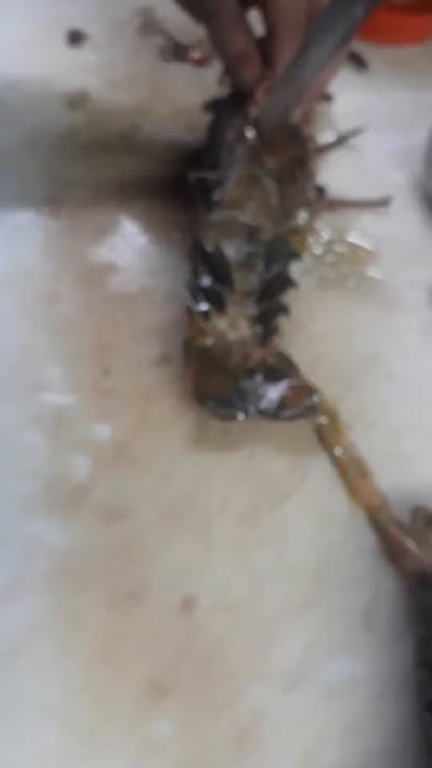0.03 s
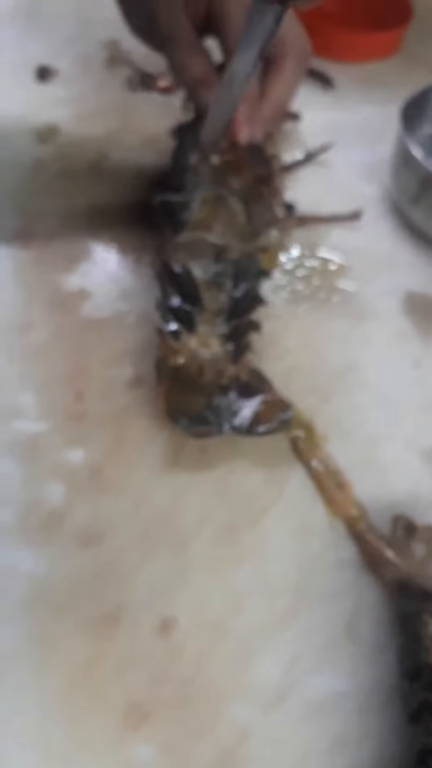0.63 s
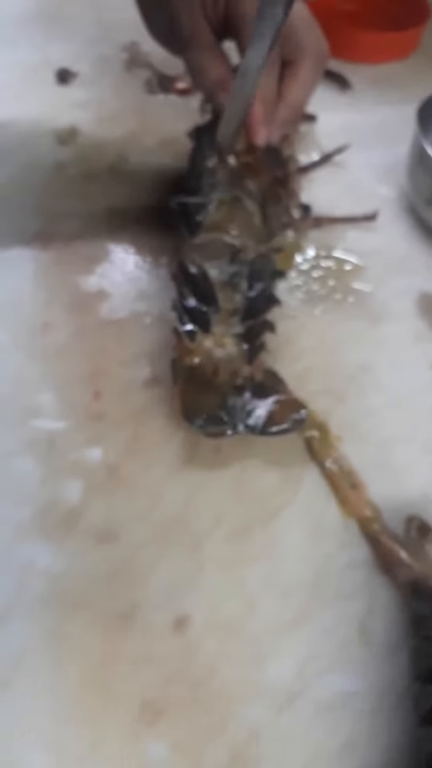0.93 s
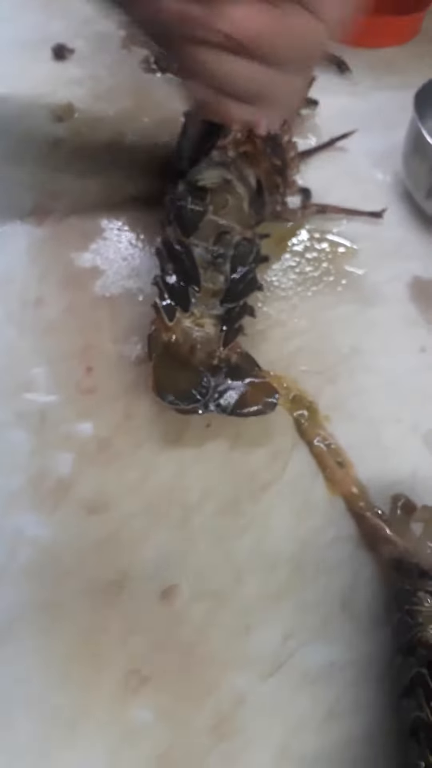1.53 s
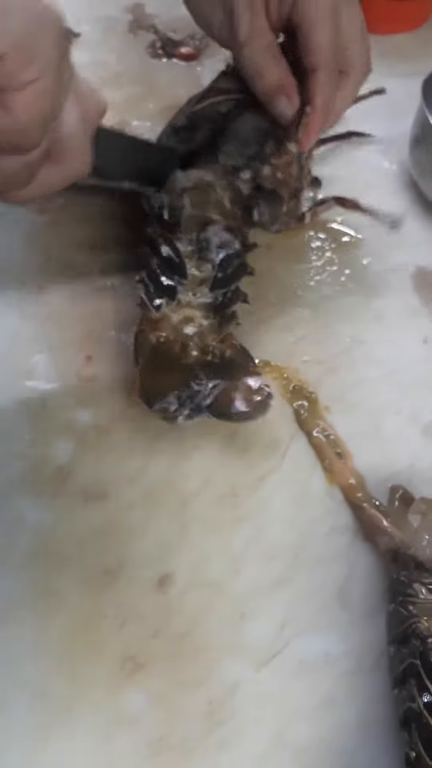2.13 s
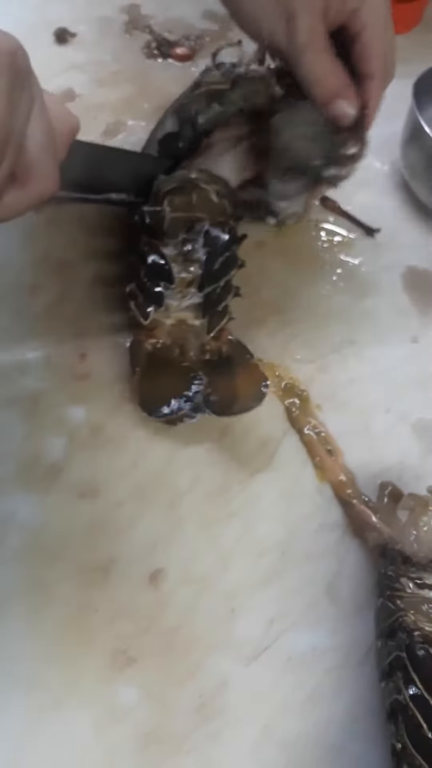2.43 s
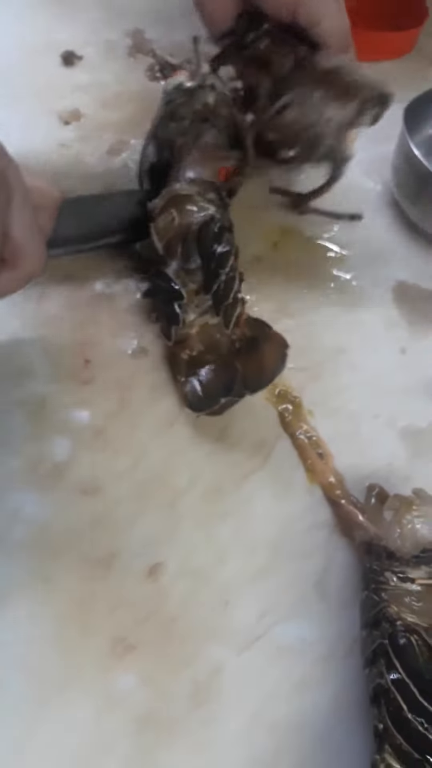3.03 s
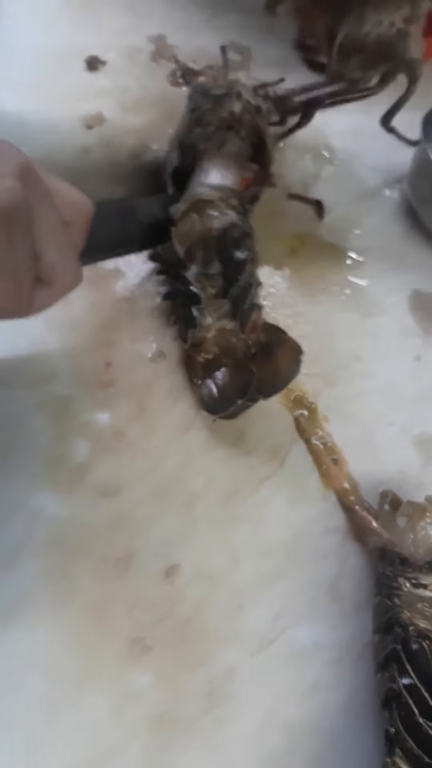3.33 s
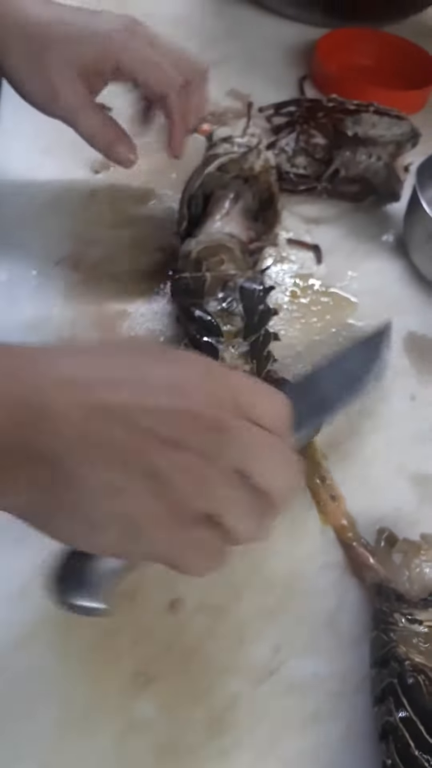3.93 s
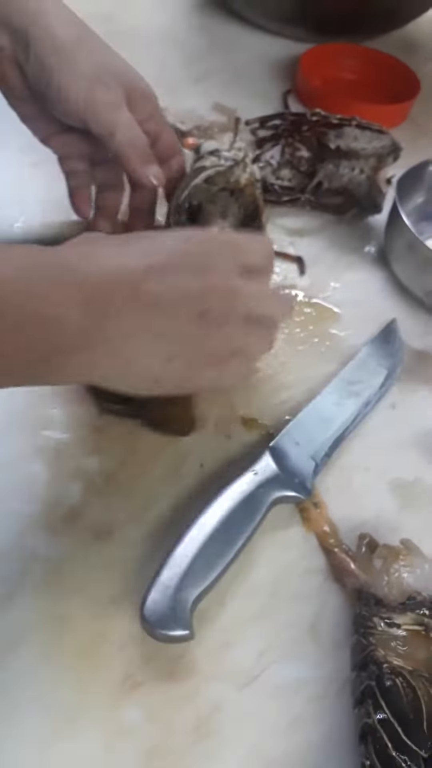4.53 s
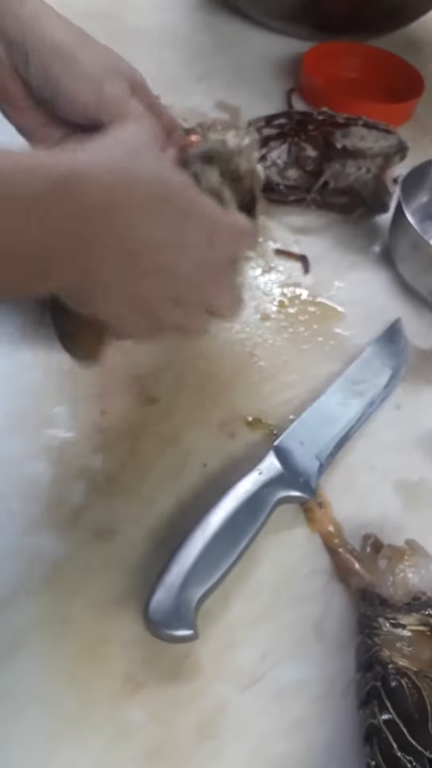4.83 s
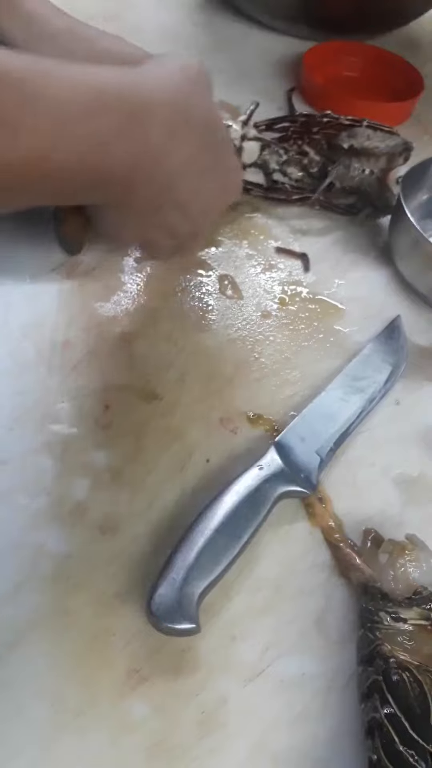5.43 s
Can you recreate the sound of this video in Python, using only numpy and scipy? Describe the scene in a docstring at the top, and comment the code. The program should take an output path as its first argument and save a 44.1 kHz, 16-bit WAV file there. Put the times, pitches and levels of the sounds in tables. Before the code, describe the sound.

A kitchen fan roars throughout, gently swelling and sinking. Close to the microphone, a knife cuts into a lobster, and the shell snaps in an irregular run of short, dry cracks with faint squeaky scrapes. After a pause and one more small scrape, the steel knife is put down on a plastic board, knocking and clinking brightly as it rocks to rest. The room adds a short tail.

```python
"""A lobster is cut open on a plastic board: the shell snaps in short, dry cracks and the blade scrapes.
The all-steel knife is then put down, knocks on the board and clinks as it rocks to rest.
Behind it a kitchen roar of moving air, probably an extractor fan, swells and sinks.
One close microphone hears it all, with a short room tail on the shell and the knife."""
import sys
import numpy as np
from scipy import signal
from scipy.fft import rfft, irfft, next_fast_len
from scipy.io import wavfile
from scipy.ndimage import uniform_filter1d, minimum_filter1d, map_coordinates

SR = 44100
rng = np.random.default_rng(int(sys.argv[2]) if len(sys.argv) > 2 else 0)


def file_out(sig):
    """Save sig as 16-bit WAV at sys.argv[1]."""
    # one column per channel
    cols = np.atleast_2d(sig).T
    # limit, then scale
    lim = np.clip(cols, -1, 1)
    pcm = np.round(lim * 32767).astype(np.int16)
    wavfile.write(sys.argv[1], SR, pcm)


N = 245637

# The swell of the fan's roar. Each row: time in seconds, strength in dB.
ROAR_SWELL = [(0.1, -27.5), (0.6, -25.5), (1.0, -25), (1.4, -28), (1.75, -29.0), (2.1, -32), (2.7, -34.5),
              (3.2, -32.9), (3.6, -25.5), (4.1, -24.5), (4.55, -28.5), (5.25, -29.5), (5.57, -26)]
# The roar's low, middle and top layers. Each row: frequency in Hz, relative level in dB.
RUMBLE_SPECTRUM = [(25, -33), (45, -39), (65, -17), (88, -2), (112, -3), (140, 2), (195, 0.5), (225, 2),
                   (255, -2.5), (305, 2.5), (350, -6.5), (450, -13.5), (700, -37)]
AIR_SPECTRUM = [(200, -15.5), (350, -6.5), (450, -4.5), (600, -2.5), (800, -2), (1250, 0), (1700, -2),
                (2200, -3.5), (3000, -6), (4500, -6), (7000, -14.5), (9100, -23.5), (15000, -78)]
HISS_SPECTRUM = [(3500, -13), (5500, -6), (6500, -5), (8000, 0.5), (9500, 0.5), (11500, 2.5), (13500, -1.5),
                 (15800, -4)]
# A faint drone, perhaps of the fan housing. Each row: centre in Hz, width in Hz, relative level in dB.
DRONE_PEAKS = [(95, 2.9, -8.5), (194.7, 11.5, -0.5), (301.4, 4.4, -1.5)]
# The shell breaks. Each row: start in seconds, level in dB, fragment pitch in Hz,
# splinter trim in dB, hollow ring trim in dB.
SHELL_CRACKS = [(1.0287, -4, 5200, 1, 2), (1.0338, -2, 3900, -7.5, -8), (1.149, -14.5, 3500, -7, 2),
                (1.3715, -5, 4740, -8.5, -11), (1.6585, -5, 5740, -11, -12), (1.7980, -10.5, 3180, -4, -15),
                (1.875, -13.5, 2900, -8, -10), (1.8990, -8, 4600, -12, -2), (1.9214, -14, 3600, -19, -18),
                (1.9400, -11.5, 5170, -0.5, -17), (2.0339, -8, 4600, -9.5, -2),
                (2.0989, -8.5, 2970, -6, -4), (2.1016, -4.5, 4600, -8, -2.5), (2.2669, -9, 4300, -26, -17),
                (2.302, -15, 4200, -15, -12)]
# The colour of a 4 kHz fragment and of splinters. Each row: frequency in Hz, relative level in dB.
FRAGMENT_SPECTRUM = [(300, -47), (1000, -4.5), (2500, -2), (4000, 7), (5000, -1), (6500, -8.5),
                     (16000, -25)]
SPLINTER_SPECTRUM = [(2000, -13), (5000, -0.5), (9000, -9.5), (13000, -1.5), (16000, -5.5)]
# The hollow carapace. Each row: frequency in Hz, t60 in seconds, relative level in dB.
CARAPACE_MODES = [(1065, 0.014, -6), (1830, .03, -13), (2300, 0.018, -15), (2790, 0.018, -7.5)]
# The blade drags on the shell. Each row: start in seconds, length in seconds, squeak level in dB,
# squeak pitch in Hz, rasp level in dB.
BLADE_STROKES = [(1.033, 0.066, -36, 3430, -35), (1.576, 0.064, -29, 3450, -34),
                 (2.112, 0.17, -40, 4500, -44), (3.595, 0.071, -36, 4550, -30.5)]
# The colour of the rasp. Each row: frequency in Hz, relative level in dB.
RASP_SPECTRUM = [(2000, -8), (4000, -3), (6000, 3), (8500, -1.5), (10000, -8), (13000, -12), (16000, -23)]
# The knife touches down. Each row: start in seconds, ring level in dB, damping factor, tick level in dB.
KNIFE_CLINKS = [(4.0322, 0.5, 2.2, -15), (4.089, -4, 4, -18), (4.1951, 1, 0.99, -13),
                (4.2598, -3, 3.4, -16), (4.295, 1, 1.1, -11.5)]
# The part of the knife that lands, one for each clink.
CLINK_CONTACTS = ["edge", "heel", "handle", "heel", "tip"]
# The knife's ring. Each row: frequency in Hz, t60 in seconds before damping, then relative levels in dB
# for a landing on the edge, handle, heel and tip.
STEEL_MODES = [(3445, .36, -15.5, -18, -42, -25), (4086, .35, -32, -39, -45, -39),
               (4517, .38, -30, -28, -15, -24), (4673, .31, -23, -9, -32, -11.5),
               (5128, .5, -22, -16.5, -22, -39), (5895, .35, -29, -25, -45, -44),
               (6445, .14, -42, -15.5, -29, -23), (6820, .22, -40, -32, -36, -38),
               (7219, .29, -43, -21, -38, -20), (7830, .22, -42, -38, -54, -33),
               (9711, .27, -44, -21, -42, -34), (10650, .13, -48, -19, -38, -15),
               (11005, .14, -40, -21, -44, -18), (11120, .16, -43, -27, -47, -20),
               (11790, .2, -50, -36, -52, -25), (12335, .14, -50, -23, -43, -24),
               (13290, .26, -58, -29, -44, -42), (13825, .12, -60, -44, -46, -26),
               (15180, .15, -57, -34, -52, -54)]
# The handle thumps the board. Each row: start in seconds, level in dB, low-pass cutoff in Hz.
HANDLE_KNOCKS = [(4.1762, 4, 5000), (4.2542, -1.5, 1490)]
# The plastic board. Each row: frequency in Hz, t60 in seconds, relative level in dB.
BOARD_MODES = [(197, 0.059, -24.5), (430, 0.022, -13.5), (765, 0.025, -17), (1170, 0.0087, -11),
               (2000, 0.0088, -1), (2300, 0.0097, -6), (2910, 0.022, -11), (4520, 0.042, -14)]
# The kitchen's tail. Each row: frequency in Hz, t60 in seconds.
ROOM_DECAY = [(200, 0.93), (2000, 0.37), (14000, 0.38)]


def amp(db):
    """Decibels to gain."""
    return 10 ** (np.asarray(db) / 20)


def unit(x):
    """Scale to rms 1."""
    return x / np.sqrt(np.mean(x ** 2) + 1e-20)


def along(points, hz):
    """Read (Hz, value) points on a log frequency axis."""
    freqs, values = np.transpose(points)
    return np.interp(np.log(hz + 1), np.log(freqs + 1), values)


def clock(size):
    """Sample times in seconds."""
    return np.arange(size) / SR


def filtered(x, response):
    """Filter x by a gain given as a function of Hz."""
    size = x.shape[-1]
    padded = next_fast_len(size + 4096)
    return irfft(rfft(x, padded) * response(np.fft.rfftfreq(padded, 1 / SR)), padded)[..., :size]


def coloured(x, spectrum, stretch=1):
    """EQ x with a spectrum, stretched in frequency, and scale to rms 1."""
    return unit(filtered(x, lambda hz: amp(along(spectrum, hz / stretch))))


def fade(t, t60):
    """Exponential decay, 60 dB down after t60 seconds."""
    return np.exp(-np.log(1000) * t / max(t60, 1e-4))


def ring(t, modes):
    """Struck modes, each (Hz, t60 s, dB), dying away from random phases."""
    return sum(amp(db) * fade(t, t60) * np.sin(2 * np.pi * (hz * t + rng.random()))
               for hz, t60, db in modes)


def add(track, start_s, sound):
    """Mix a sound into the track."""
    part = track[round(start_s * SR):][:len(sound)]
    part += sound[:len(part)]


def wobble(knots_per_s):
    """A smooth random curve."""
    return map_coordinates(rng.standard_normal(256), [clock(N) * knots_per_s])


def rush(spectrum, patchy_db):
    """Turbulent air: noise whose level varies in random patches of time and frequency."""
    bands = signal.stft(rng.standard_normal(N), nperseg=512)[2]
    patches = uniform_filter1d(rng.standard_normal(bands.shape), size=6, axis=0)
    patches = uniform_filter1d(patches, size=12, axis=1)
    turbulence = signal.istft(bands * amp(patchy_db * unit(patches)), nperseg=512)[1][:N]
    return coloured(turbulence, spectrum)


def fan():
    """One swell rides rumble, rushing air and hiss together; a faint drone follows the rumble."""
    def housing(hz):
        return sum(amp(db) / (1 + ((hz - centre) / (width / 2)) ** 2)
                   for centre, width, db in DRONE_PEAKS)

    t = clock(N)
    swell_db = np.interp(t, *np.transpose(ROAR_SWELL)) + 28.5  # unity gain at a strength of -28.5 dB
    past_middle_s = t - t.mean()  # rumble and hiss sink slowly against the air
    drone = unit(filtered(rng.standard_normal(N), housing))
    rumble_db = -38 - 0.5 * past_middle_s + 0.5 * wobble(knots_per_s=3.77)
    rumble = amp(rumble_db) * (rush(RUMBLE_SPECTRUM, patchy_db=0.6) + amp(-12) * drone)
    air = amp(-28) * rush(AIR_SPECTRUM, patchy_db=0.9)
    hiss = amp(-39 - 0.3 * past_middle_s) * rush(HISS_SPECTRUM, patchy_db=1.5)
    return amp(swell_db) * (rumble + air + hiss)


def shell_noise(t, pitch_hz):
    """Noise coloured by a shell fragment of the given pitch."""
    return coloured(rng.standard_normal(len(t)), FRAGMENT_SPECTRUM, stretch=pitch_hz / 4000)


def snap(pitch_hz, splinter_db, hollow_db):
    """A break flicks a fragment, tears on in splinters and rings the hollow carapace."""
    t = clock(SR // 10)
    flick = amp(-4) * np.sin(2 * np.pi * pitch_hz * t) * fade(t, t60=0.0059)
    tear = amp(-7.5) * shell_noise(t, pitch_hz)
    splinters = amp(splinter_db + 2.5) * coloured(rng.standard_normal(len(t)), SPLINTER_SPECTRUM)
    hollow = amp(hollow_db) * ring(t, CARAPACE_MODES)
    return flick + (tear + splinters) * fade(t, t60=0.014) + hollow


def shell_cracks():
    """The shell gives way snap by snap; a crumb breaks off with a faint tick just after each."""
    out = np.zeros(N)
    for start_s, db, *colour in SHELL_CRACKS:
        add(out, start_s, amp(db) * snap(*colour))
        crumb_s = start_s + 0.044 * rng.random()
        add(out, crumb_s, amp(db - 25) * snap(*colour))
    return out


def blade_scrapes():
    """The dragged blade rasps in dense tiny slips, which make one of its hand-damped modes squeak."""
    out, t = np.zeros(N), clock(SR // 4)
    half_width_hz = 130
    for start_s, length_s, squeak_db, squeak_hz, rasp_db in BLADE_STROKES:
        slips = rng.standard_normal(len(t)) * amp(2 * rng.exponential(size=len(t)))
        squeak = unit(filtered(slips, lambda hz: 1 / (1 + 1j * (hz - squeak_hz) / half_width_hz)))
        rasp = coloured(slips, RASP_SPECTRUM)
        stroke = np.sqrt(np.abs(np.sin(np.pi * np.clip(t / length_s, 0, 1))))
        add(out, start_s, stroke * (amp(squeak_db) * squeak + amp(rasp_db) * rasp))
    return out


def knife_clinks():
    """The knife rocks on the board; each contact chokes the last ring, leaving faint low modes."""
    out, t = np.zeros(N), clock(SR // 2)
    lies_flat_s, linger_below_hz = 4.310, 5500
    choke_times = [row[0] for row in KNIFE_CLINKS[1:]] + [lies_flat_s]
    for clink, contact, choke_s in zip(KNIFE_CLINKS, CLINK_CONTACTS, choke_times):
        start_s, db, damping, tick_db = clink
        place = ["edge", "handle", "heel", "tip"].index(contact)
        steel = ring(t, [(hz, t60 / damping, levels[place]) for hz, t60, *levels in STEEL_MODES])
        choke = fade(np.maximum(t - (choke_s - start_s), 0), t60=0.049)
        lingering = amp(-7) * filtered(steel, lambda hz: 1 / (1 + (hz / linger_below_hz) ** 10))
        tick = amp(tick_db) * fade(t, t60=0.026) * shell_noise(t, pitch_hz=4900)
        add(out, start_s, amp(db) * (steel * choke + lingering * (1 - choke)) + tick)
    return out


def board_knocks():
    """The handle thumps a dead ring out of the board; a soft contact leaves out the upper modes."""
    out, t = np.zeros(N), clock(SR // 2)
    for start_s, db, cutoff_hz in HANDLE_KNOCKS:
        plastic = ring(t, BOARD_MODES)
        thud = amp(-11.5) * fade(t, t60=0.037) * coloured(rng.standard_normal(len(t)), AIR_SPECTRUM)
        low_pass = signal.butter(2, cutoff_hz, fs=SR)
        add(out, start_s, amp(db) * signal.lfilter(*low_pass, plastic + thud))
    return out


def kitchen_reverb(send):
    """A short room tail, dying sooner in the treble."""
    hz, t, bands = signal.stft(rng.standard_normal(SR // 2), SR, nperseg=256)
    decay = np.exp(-np.log(1000) * t / along(ROOM_DECAY, hz)[:, None])
    tail = signal.istft(bands * decay, SR, nperseg=256)[1]
    return signal.fftconvolve(send, tail / np.linalg.norm(tail))[:N]


def limited(x, ceiling_db):
    """A fast limiter: the gain ducks for a few milliseconds around each peak."""
    gain = 1 / np.maximum(1, np.abs(x) / amp(ceiling_db))
    return x * uniform_filter1d(minimum_filter1d(gain, size=180), size=180)


def scene():
    """Close work on the board in front of the fan, alike in both channels."""
    shell = shell_cracks() + blade_scrapes()
    knife = knife_clinks() + board_knocks()
    room = kitchen_reverb(amp(-11.5) * shell + amp(-8.5) * knife)
    mono = shell + knife + room + fan()
    return np.array([mono, mono])


def record(dry):
    """The recorder opens after a moment, cuts deep bass, limits the peaks and drops the top treble."""
    opens_s, low_cut_hz, high_cut_hz = 0.1055, 52, 15900
    opened = dry * (clock(N) >= opens_s)
    lean = signal.sosfilt(signal.butter(4, low_cut_hz, "highpass", fs=SR, output="sos"), opened)
    return filtered(limited(lean, ceiling_db=-0.3), lambda hz: 1 / (1 + (hz / high_cut_hz) ** 200))


dry = scene()
out = record(dry)
file_out(out)
```